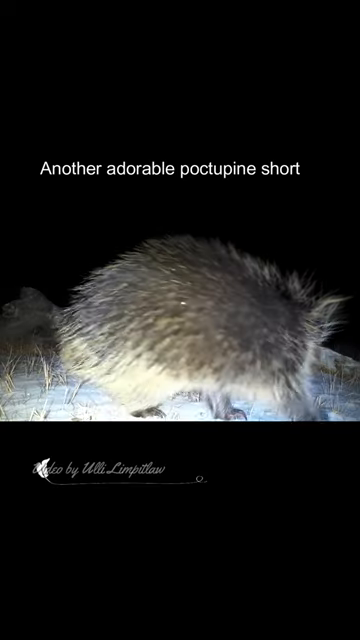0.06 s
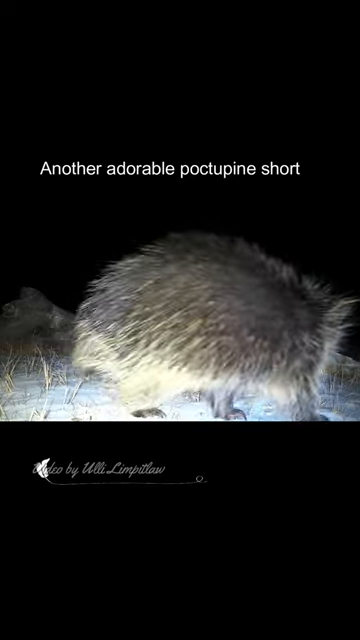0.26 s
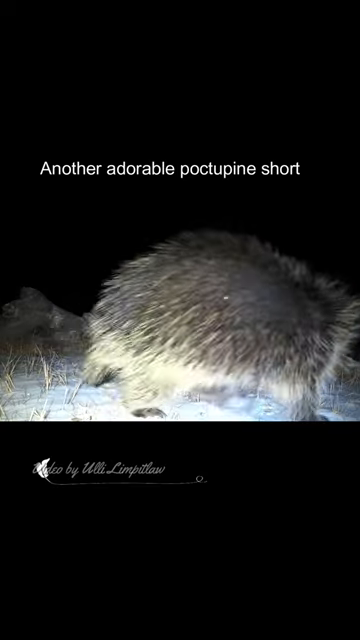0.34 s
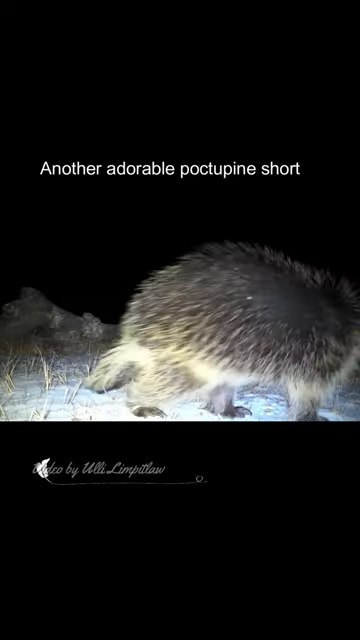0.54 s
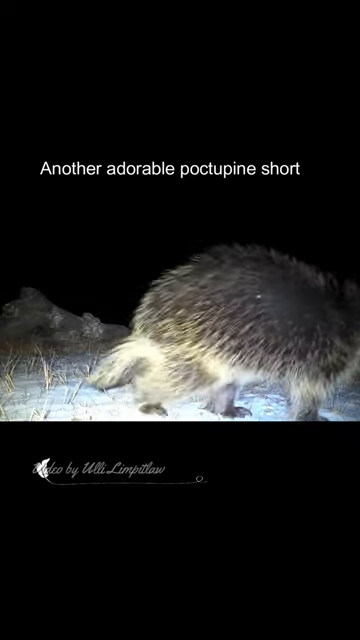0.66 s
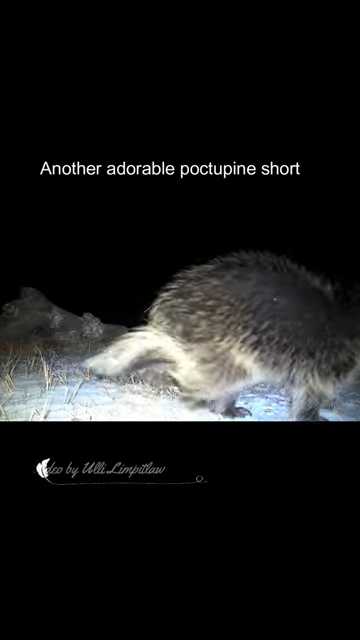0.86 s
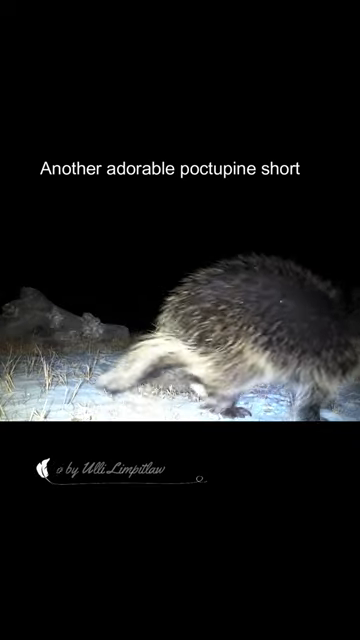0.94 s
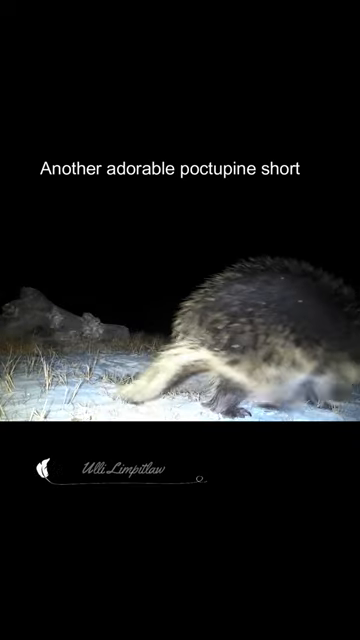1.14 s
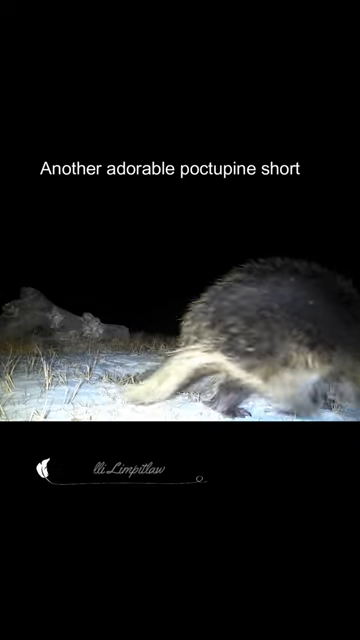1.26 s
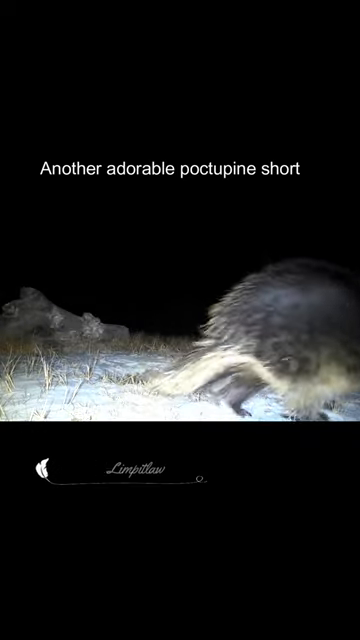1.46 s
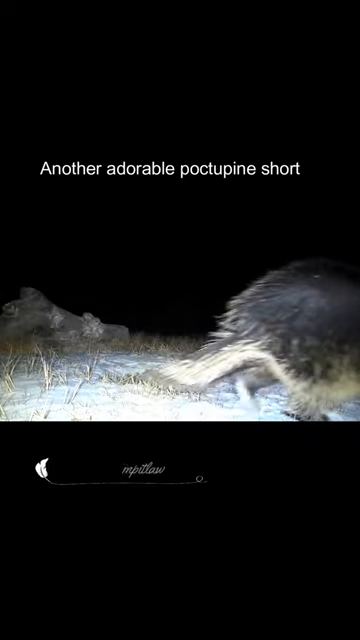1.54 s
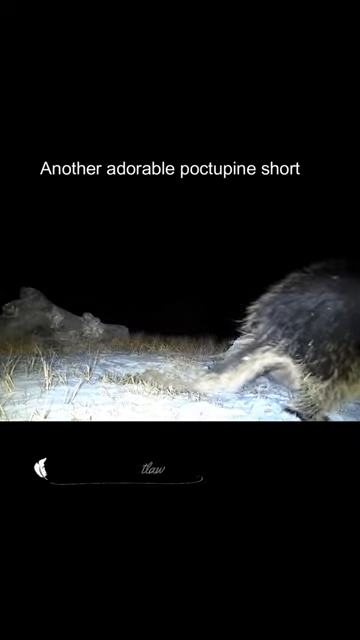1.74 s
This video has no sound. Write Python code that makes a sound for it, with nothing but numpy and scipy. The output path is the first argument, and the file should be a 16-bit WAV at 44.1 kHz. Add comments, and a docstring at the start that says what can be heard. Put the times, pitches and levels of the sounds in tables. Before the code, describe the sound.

Light wind rumbles faintly on the microphone outdoors at night, under a fine, even hiss. The rumble swells from about 0.5 to 0.8 seconds, then eases away. Faint dull ticks and brief rustles, perhaps a porcupine walking on dry ground, come between 0.2 and 0.6 seconds, with another tick near 0.9 and a tiny rustle near 1.3. Soft bumps of air follow before the end at 1.8 seconds.

```python
"""A quiet night outdoors: light air rumbles on one microphone, swelling once, under a fine, even hiss.
The hiss rises and sinks a little. A few faint, dull ticks and brief crisp rustles sit in it,
perhaps from a porcupine walking by over dry ground."""
import sys
import numpy as np
from scipy.fft import rfft, irfft, next_fast_len
from scipy.io import wavfile
from scipy.ndimage import map_coordinates

SR = 44100
rng = np.random.default_rng(int(sys.argv[2]) if len(sys.argv) > 2 else 0)


def transcribe(u):
    """Save the signal u as a 16-bit wav file named by the first command-line argument.

    u: samples, shape (n,) or (channels, n), limited to [-1, 1]; the rate is SR.
    q: integer samples, one column per channel.
    """
    v = np.clip(np.atleast_2d(u).T, -1, 1)
    q = np.round(v * 32767).astype(np.int16)
    wavfile.write(sys.argv[1], SR, q)


N = 79380

# level of the wind rumble (s, dB)
RUMBLE = [(0, -57.5), (.22, -52.5), (.39, -55.5), (.48, -37.5), (.56, -41.5), (.66, -46.5), (.76, -35.5), (.81, -50.5), (1.03, -47.5), (1.11, -55.5), (1.3, -51.5), (1.47, -59), (1.58, -60.5), (1.8, -58)]
# level of the low rush of air (s, dB)
RUSH = [(0, -61.5), (.14, -64.5), (.24, -59), (.31, -60), (.44, -59), (.54, -57.5), (.65, -57.5), (.8, -59), (1.03, -58), (1.2, -62), (1.35, -59), (1.49, -63.5), (1.59, -58.5), (1.8, -63)]
# level of the hiss (s, dB)
HISS = [(0, -68.5), (.11, -67), (.25, -64.5), (.39, -64.5), (.435, -66), (.46, -63), (.63, -63.5), (.685, -61.5), (.76, -64), (1.05, -64), (1.12, -66), (1.25, -66.5), (1.28, -64), (1.36, -64.5), (1.5, -67), (1.54, -64.5), (1.66, -67), (1.8, -67.5)]
# spectra (Hz, dB per Hz)
RUMBLE_COLOUR = [(4, -1.5), (12, 0.5), (28, -4.5), (45, -16.5), (70, -25.5), (120, -39), (300, -80), (1000, -110)]
RUSH_COLOUR = [(30, 2.5), (70, 0), (100, -0.5), (160, -4.5), (230, -10.5), (330, -12), (600, -20.5), (1000, -25.5), (2000, -39), (6000, -49.5)]
HISS_COLOUR = [(100, -20.5), (500, 6.5), (1000, 5), (2000, 4), (4000, 2.5), (7000, 1.5), (11000, 1.5), (14400, 1), (15700, -3.5)]
RUMBLE_DB, RUSH_DB, HISS_DB = 5, 3.5, -0.62  # gain of each layer
# dull ticks and small crunches on the ground (s, peak dB, centre Hz, t60 s)
TICKS = [(0.175, -55.5, 520, 0.053), (0.239, -53, 330, 0.032), (0.347, -54, 890, 0.026), (0.466, -53.5, 1090, 0.022), (0.51, -57, 1500, .03), (0.546, -50.5, 760, 0.015), (0.9315, -54, 550, 0.012), (0.932, -54, 2400, 0.0096)]
# rustles and scuffs (s, level dB, length s, centre Hz)
RUSTLES = [(.2395, -56, 0.00053, 13000), (0.497, -70.5, 0.021, 1250), (1.337, -68.5, .006, 5000), (1.345, -71, 0.035, 800)]
RUSTLE_OCTAVES = 0.63
TOP_HZ = 15760  # fixed
TICK_ATTACK_S = 0.00072
TICK_T60_S = .024
TICK_OCTAVES = 0.97
# soft, deep bumps of air on the microphone (s, level dB, length s, centre Hz)
BUMPS = [(.24, -48.5, 0.018, 54), (1.26, -45, 0.028, 8.4), (1.325, -44, 0.0153, 13), (1.372, -57.5, 0.028, 65), (1.51, -44, 0.0089, 20), (1.585, -49.5, 0.013, 49)]
BUMP_OCTAVES = 0.62
TICK_PUSH_DB, TICK_PUSH_CYCLES = 7.5, 0.4  # first push of each contact: gain, life in cycles


def amp(db):
    """Decibels to gain."""
    return 10 ** (np.asarray(db) / 20)


def unit(x):
    """Scale to rms 1."""
    return x / np.sqrt(np.mean(x ** 2) + 1e-20)


def curve(rows):
    """(s, value) rows as one value per sample."""
    return np.interp(np.arange(N) / SR, *np.transpose(rows))


def wobble(rate):
    """A smooth random curve, rate knots a second."""
    return map_coordinates(rng.standard_normal(N // 50), [np.arange(N) * rate / SR], mode="wrap")


def filtered(x, response):
    """x times a response of frequency."""
    m = next_fast_len(N + SR // 2)
    return irfft(rfft(x, m) * response(np.fft.rfftfreq(m, 1 / SR)), m)[:N]


def noise(colour):
    """Noise of rms 1 with a (Hz, dB) spectrum."""
    f, db = np.transpose(colour)
    return unit(filtered(rng.standard_normal(N), lambda hz: amp(np.interp(np.log(hz + 1), np.log(f + 1), db))))


def band(centre_hz, octaves):
    """Noise of rms 1 in a bell around a centre."""
    return unit(filtered(rng.standard_normal(N), lambda hz: np.exp(-.5 * (np.log2((hz + 1) / centre_hz) / octaves) ** 2)))


def wind(flutter_db=0.9, flutter_rate=35):
    """Deep buffeting on the microphone and a low, fluttering rush of air above it."""
    rumble = amp(curve(RUMBLE) + RUMBLE_DB) * noise(RUMBLE_COLOUR)
    rush = amp(curve(RUSH) + RUSH_DB + flutter_db * wobble(flutter_rate)) * noise(RUSH_COLOUR)
    return rumble + rush


def hiss(waver_db=0.4, waver_rate=70):
    """A nearly white hiss that wavers slightly."""
    return amp(curve(HISS) + HISS_DB + waver_db * wobble(waver_rate)) * noise(HISS_COLOUR)


def ticks(gain_db=-5):
    """Small contacts: one dull push and a crunch that dies at once, without ringing."""
    out = np.zeros(N)
    for s, db, hz, t60 in TICKS:
        t = np.maximum(np.arange(N) / SR - s, 0)
        push = amp(TICK_PUSH_DB) * np.sin(2 * np.pi * hz * t) * np.exp(-hz * t / TICK_PUSH_CYCLES)
        crunch = burst(amp(gain_db - 60 * t / t60) * (1 - np.exp(-t / TICK_ATTACK_S)), hz, TICK_OCTAVES)
        out += amp(db) * (push + crunch)
    return out


def rustles():
    """Brief brushes, as of dry stalks and loose soil."""
    return swells(RUSTLES, RUSTLE_OCTAVES)


def burst(envelope, centre_hz, octaves):
    """A short puff of band noise that carries the energy of its envelope."""
    return unit(envelope * band(centre_hz, octaves)) * np.sqrt(np.mean(envelope ** 2))


def swells(rows, octaves):
    """Puffs of noise that rise and fall smoothly."""
    t = np.arange(N) / SR
    return sum(burst(amp(db) * np.exp(-.5 * ((t - s) / length) ** 2), hz, octaves) for s, db, length, hz in rows)


def bumps():
    """Single eddies that push on the microphone."""
    return swells(BUMPS, BUMP_OCTAVES)


def scene():
    """All sources at one microphone."""
    return (wind() + bumps() + hiss() + ticks() + rustles())[None]


def record(dry):
    """The recorder keeps nothing above its band limit."""
    return np.array([filtered(channel, lambda hz: hz < TOP_HZ) for channel in dry])


dry = scene()
out = record(dry)
transcribe(out)
```